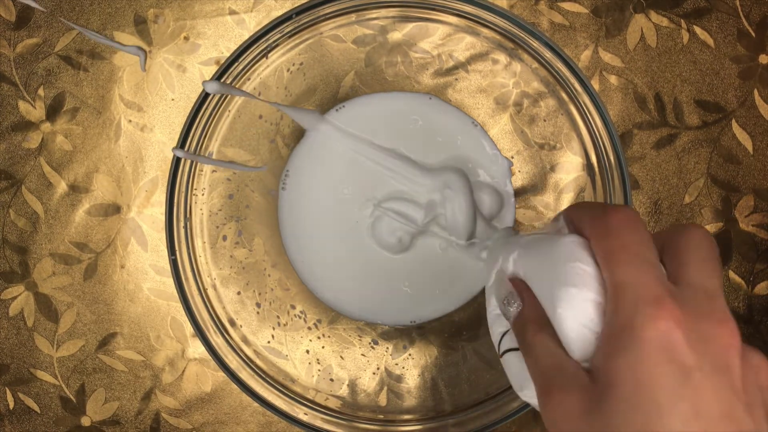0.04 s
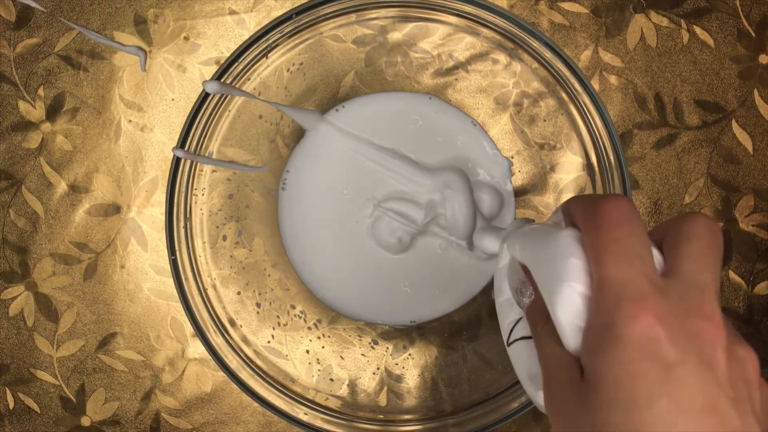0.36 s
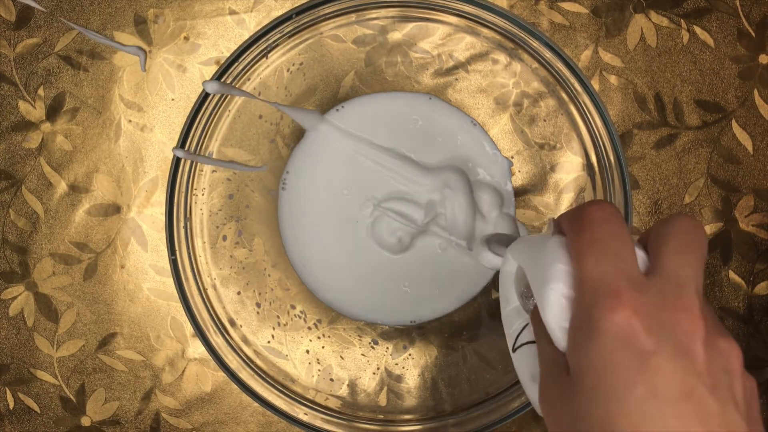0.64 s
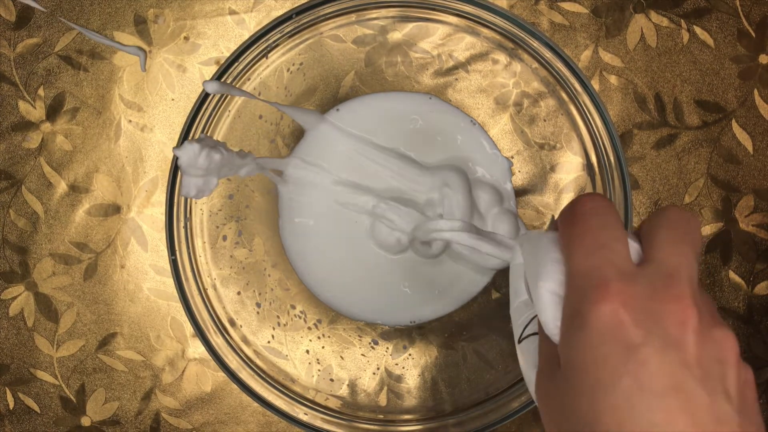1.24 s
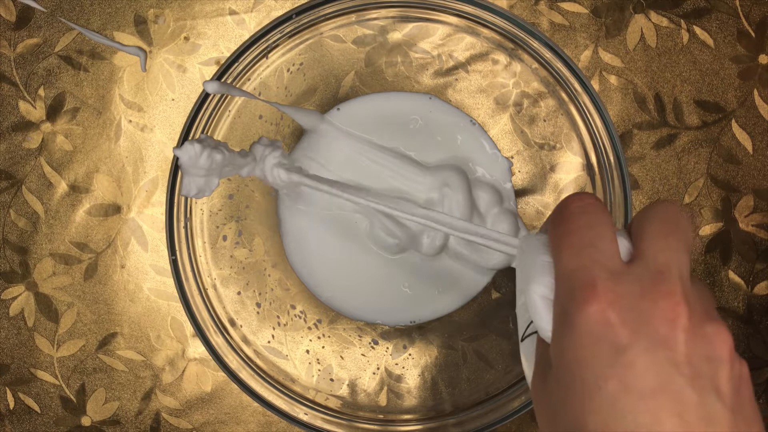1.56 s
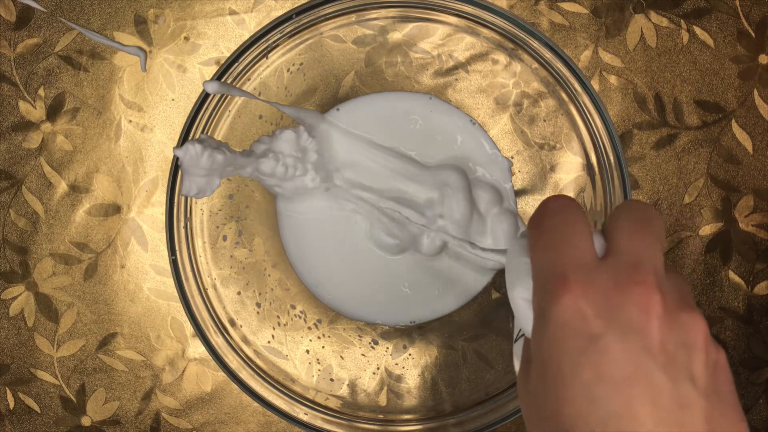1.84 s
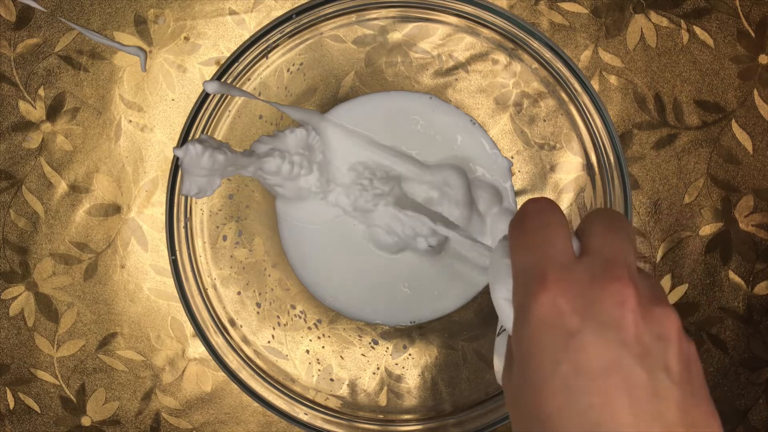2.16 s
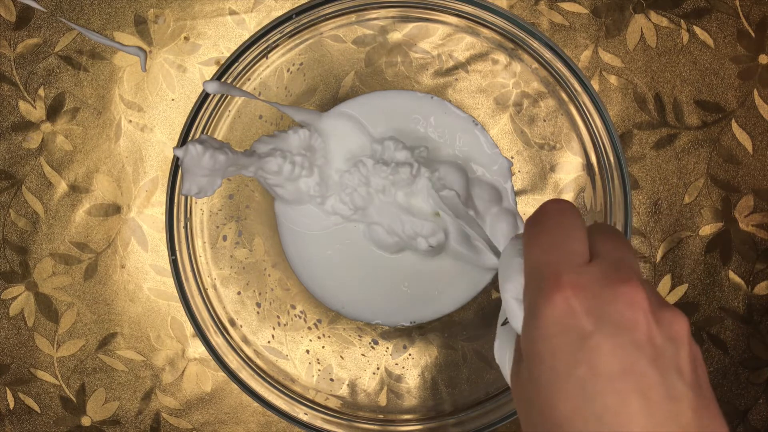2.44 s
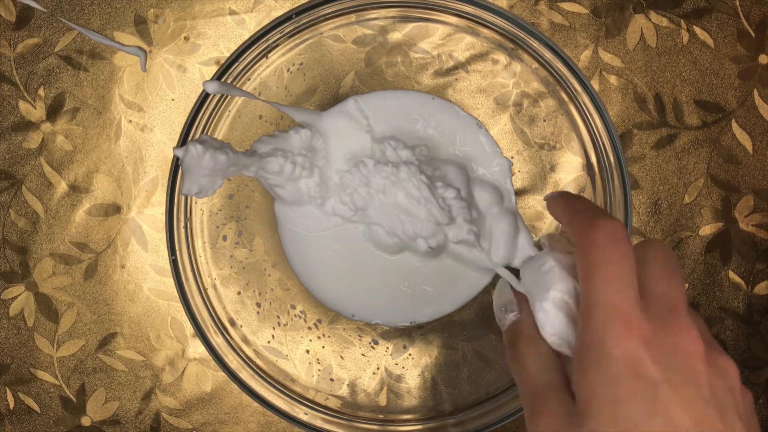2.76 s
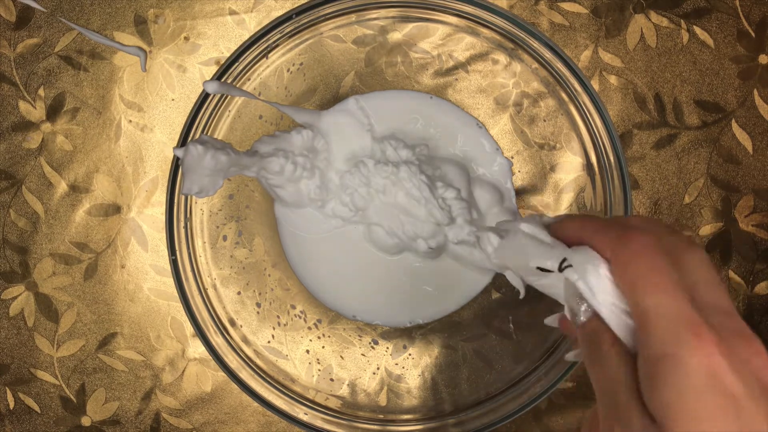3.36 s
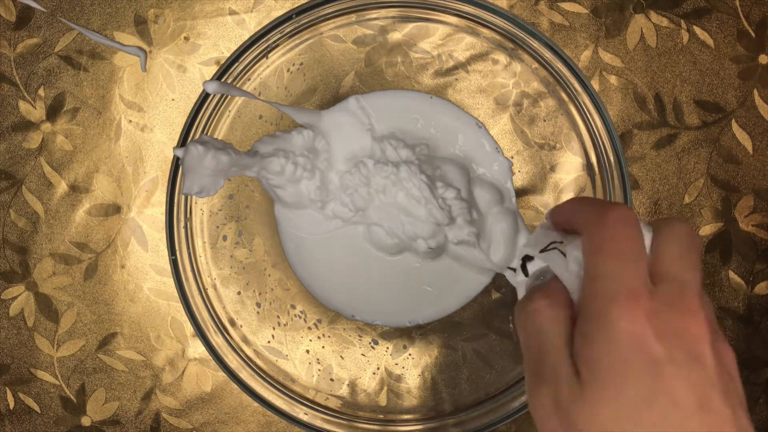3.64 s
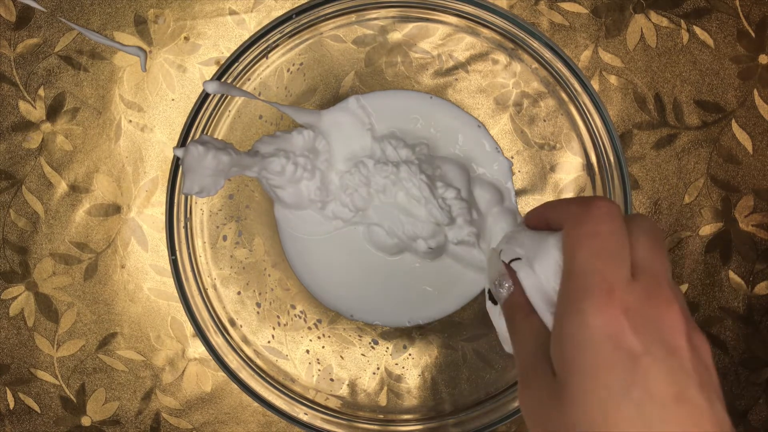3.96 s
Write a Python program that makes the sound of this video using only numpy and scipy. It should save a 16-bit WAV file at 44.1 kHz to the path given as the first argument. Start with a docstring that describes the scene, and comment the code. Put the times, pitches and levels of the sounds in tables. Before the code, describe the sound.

Foam sputters from a squeezed plastic bottle in short, hissing puffs that thicken and splatter into a glass bowl. Before and after, a hand faintly rubs and crinkles the plastic. Heard close by in a quiet room.

```python
"""Short crackling puffs, with sizzle between them and a few ringing bubbles, run together and splatter.
A soft plastic bottle is being squeezed empty over a glass bowl on a table, close by in a quiet room.
Each puff is trapped air bursting through the foam in the nozzle; the foam splatters as it lands.
Before and after, the hand rubs and crinkles the plastic."""
import sys
import numpy as np
from scipy import signal
from scipy.fft import rfft, irfft
from scipy.io import wavfile
from scipy.ndimage import uniform_filter1d

SR = 44100
rng = np.random.default_rng(int(sys.argv[2]) if len(sys.argv) > 2 else 0)


def wav_out(sig):
    """Save sig, one row per channel (or a flat mono array), as 16-bit PCM at SR to the path in sys.argv[1]."""
    wavfile.write(sys.argv[1], SR, np.round(np.clip(np.atleast_2d(sig).T, -1, 1) * 32767).astype(np.int16))


N = 176400
T = np.arange(N) / SR
FREQS = np.fft.rfftfreq(8192, 1 / SR)
GURGLE_HZ, SPIT_HZ, HISS_HZ = 2110, 5030, 7840  # where a puff's low, middle and high parts begin
TOP_HZ = 15900  # upper edge of the treble
BUBBLE_RISE_S = 0.00022
# How loud the sizzle between puffs is: t/s, level/dB
SIZZLE = [(.4, -78), (.43, -58), (.482, -62), (.51, -55.5), (.58, -56.5), (.67, -57), (.72, -52),
          (.86, -45), (.98, -49.5), (1.04, -61), (1.15, -73.5), (1.205, -58), (1.235, -63.5), (1.28, -54.5),
          (1.45, -51.5), (1.58, -51.5), (1.68, -48), (1.78, -48.5), (1.87, -56.5), (2.12, -52),
          (2.23, -41.5), (2.32, -46), (2.47, -46.5), (2.57, -49), (2.635, -50.5), (2.68, -85)]


def undb(db):
    """Turn decibels into a gain to multiply by."""
    return 10 ** (np.asarray(db) / 20)


def curve(rows, column=1):
    """One column of a table, joined by straight lines in time."""
    rows = np.array(rows)
    return np.interp(T, rows[:, 0], rows[:, column])


def noise():
    """White noise: an even hiss with a level of one."""
    return rng.standard_normal(N)


def colour(points):
    """A gain for each frequency, drawn through rows of f/Hz, level/dB."""
    hz, db = np.array(points).T
    return undb(np.interp(np.log(FREQS + 1), np.log(hz), db))


def resonance(hz, width):
    """Gains that favour the frequencies near one pitch."""
    return 1 / np.hypot(1, (FREQS ** 2 - hz ** 2) / (FREQS * width + 1))


def above(hz, order=12):
    """Gains that keep what lies above hz; a higher order cuts more sharply."""
    return 1 / np.sqrt(1 + (hz / (FREQS + 1)) ** (2 * order))


def below(hz, order=12):
    """Gains that keep what lies below hz."""
    return 1 / np.sqrt(1 + (FREQS / hz) ** (2 * order))


def ring(x, gain):
    """Filter x with the given gains, scaled so that white noise keeps its level."""
    cepstrum = irfft(np.log(gain / gain.max() + 1e-4))
    half = len(cepstrum) // 2
    # Folding puts all the ringing after the sound that starts it.
    folded = np.r_[cepstrum[0], 2 * cepstrum[1:half], np.zeros(half)]
    response = irfft(np.exp(rfft(folded)))[:half]
    return signal.fftconvolve(x, response / np.linalg.norm(response))[:N]


def crackle(per_s, decay_s, spread_db):
    """Loudness over time of tiny bursts of random timing and size, near one overall."""
    power = (rng.random(N) < per_s / SR) * undb(spread_db * noise()) ** 2 / per_s
    power = signal.lfilter([1], [1, -np.exp(-2 / (decay_s * SR))], power)
    return np.sqrt(power / power.mean())


def swell(level, open_s=0.0012):
    """Smooth a loudness curve so that each burst takes a moment to open."""
    return np.sqrt(np.abs(uniform_filter1d(level ** 2, int(open_s * SR))))


def room_tone():
    """Quiet room air with a low mains hum."""
    # Tones of the hum: f/Hz, level/dB
    hum_tones = [(49.2, -77.5), (98.4, -80.5), (197.3, -79)]
    # Tone colour of the air: f/Hz, relative level/dB
    air_colour = [(28, -27), (45, 1), (70, 1.5), (120, -5), (200, -6), (400, -12.5), (1000, -19.5),
                  (3000, -14.5), (16000, -34.5)]
    hum = sum(undb(db) * np.sqrt(2) * np.sin(2 * np.pi * (hz * T + rng.random()))
              for hz, db in hum_tones)
    return hum + undb(-70.5) * ring(noise(), colour(air_colour))


def hand_rub():
    """Skin slips over the plastic in fine grains; the full bottle sounds duller."""
    # How loud the rubbing is: t/s, level/dB
    rub_levels = [(0, -63), (.03, -57.5), (.145, -56), (.17, -60), (.31, -61.5), (.34, -66), (.39, -71),
                  (.42, -57.5), (.6, -72), (2.68, -60.5), (2.74, -56), (2.88, -60.5), (3.0, -69.5),
                  (3.02, -60), (3.135, -55), (3.18, -60), (3.25, -56.5), (3.42, -66.5), (3.44, -57.5),
                  (3.52, -60.5), (3.67, -58.5), (3.8, -63), (3.92, -56.5), (4.0, -58)]
    # Its tone colour: f/Hz, relative level/dB
    rub_colour = [(200, -7), (430, -9), (650, -3), (950, -6), (1500, -1), (2400, -0.5), (3200, -4.5),
                  (3900, 0.5), (4800, -5), (6300, -1), (7800, -4), (9400, 0), (10400, -6.5), (13500, -2),
                  (16000, -6)]
    grains = noise() * crackle(per_s=2500, decay_s=0.00083, spread_db=4.5) * undb(curve(rub_levels))
    bright = ring(grains, colour(rub_colour) * below(TOP_HZ, order=30))
    dull = signal.lfilter(*signal.butter(1, 9900, fs=SR), bright)
    return np.where(T < 0.98, dull, bright)


def crinkles(decay_s=0.0013, boost_db=2.5):
    """The plastic wall crinkles with single ticks."""
    # Ticks: t/s, peak level before the boost/dB, centre f/Hz
    ticks = [(0.021, -53, 2500), (.128, -46, 7000), (.14, -40.5, 9050), (.206, -40.5, 1500),
             (.315, -42, 7080), (.362, -47, 4470), (.402, -47, 5970), (2.72, -43, 11000),
             (2.737, -38.5, 10000), (2.828, -44, 7000), (2.846, -45.5, 2500), (2.865, -39.5, 7000),
             (3.22, -37, 14900), (3.634, -42, 14000), (3.646, -38, 13600), (3.662, -37, 14000),
             (3.671, -36, 6400), (3.839, -44, 6000), (3.922, -42, 11000), (3.975, -47, 12000)]
    out, t = np.zeros(N), T[:SR // 80]
    for start, db, hz in ticks:
        i = int(start * SR)
        burst = rng.standard_normal(len(t)) * np.exp(-t / decay_s)
        spectrum = rfft(burst, 2 * len(FREQS) - 2) * resonance(hz, width=4800) * below(TOP_HZ)
        tick = irfft(spectrum)[:len(t)]
        out[i:i + len(t)] += undb(db + boost_db) * tick / np.abs(tick).max()
    return out


def sizzle_levels():
    """Spit, hiss and gurgle levels of trickling foam: lone ticks merge as it flows harder."""
    # Tone colour of the sizzle: t/s, hiss/dB, gurgle/dB (both relative to the spit)
    balance = [(.5, -6.5, -1.5), (.65, -3.5, -5), (.75, 5.5, -9), (1.0, 3, -17), (1.15, 5.5, 7),
               (1.35, -1, -18), (1.76, 4, -9.5), (1.85, 4, 2), (1.98, 1, 13.5), (2.15, 1.5, -6),
               (2.4, 4.5, -6.5), (2.55, 8.5, -7), (2.64, -6, -7.5)]
    db = curve(SIZZLE)
    doublings = np.clip((db + 52.5) / 5.5, -1, 4)  # 5.5 dB louder ticks twice as fast
    ticks = swell(crackle(per_s=260 * 2 ** doublings, decay_s=0.0014, spread_db=3.5))
    spit = undb(db) * np.hypot(0.3, ticks)  # a steady part plus the ticks
    fizz = np.hypot(0.69 * spit, 0.53 * undb(db))  # steadier in the treble
    return spit, fizz * undb(curve(balance)), spit * undb(curve(balance, column=2))


def puff_levels(attack_s=0.0012, release_s=0.00045, sag_db=2):
    """Spit, hiss and gurgle levels of the puffs: each opens, sags while foam films tear, and closes."""
    # Air puffs, before the trim: t/s, length/s, spit/dB, hiss/dB, gurgle/dB
    puffs = [(0.487, 0.0054, -41, -47.5, -37.5), (0.495, 0.0103, -42, -50, -44.5),
             (0.537, 0.0033, -39.5, -60, -53), (0.557, 0.007, -48, -54, -44),
             (0.678, 0.013, -44, -42.5, -50.5), (0.703, 0.019, -56, -44.5, -51),
             (0.725, 0.0064, -37.5, -29.5, -42), (0.738, 0.0071, -41, -42, -49),
             (0.767, 0.014, -40.5, -35.5, -48), (0.806, 0.018, -39, -34.5, -50.5),
             (0.824, 0.0077, -39, -35.5, -45.5), (0.855, 0.0077, -41, -39.5, -45.5),
             (0.872, 0.0042, -39, -39, -73), (0.893, 0.026, -39, -39, -51.5),
             (0.916, 0.0081, -38, -36, -61), (0.944, 0.0084, -51, -39, -54), (0.955, 0.011, -50, -38, -47),
             (0.973, 0.01, -34, -35.5, -45), (1.006, 0.005, -38, -37, -48), (1.059, 0.015, -54, -50, -58),
             (1.109, 0.01, -54, -50.5, -49), (1.167, 0.024, -50.5, -49.5, -52),
             (1.245, 0.011, -55, -43.5, -56), (1.271, 0.0071, -44.5, -43, -50.5),
             (1.346, 0.02, -48, -52, -63), (1.373, 0.008, -38, -39.5, -52.5),
             (1.397, 0.0021, -55, -54, -52), (1.403, 0.0044, -36, -44, -54), (1.427, 0.0034, -41, -46, -59),
             (1.464, 0.0044, -39, -41, -54.5), (1.502, 0.0039, -43, -42, -54),
             (1.54, 0.0057, -44, -40, -55), (1.548, 0.0043, -41, -38, -53),
             (1.588, 0.022, -38.5, -39, -52.5), (1.624, 0.0021, -33, -49, -63),
             (1.638, 0.0069, -51, -36, -42), (1.648, 0.01, -36, -38, -38.5),
             (1.664, 0.0026, -34, -46, -37.5), (1.67, 0.024, -40, -40, -50),
             (1.713, 0.0043, -36.5, -37, -53), (1.747, 0.005, -40, -37.5, -48),
             (1.787, 0.012, -35.5, -36.5, -37.5), (1.798, 0.018, -35, -35.5, -34.5),
             (1.821, 0.006, -34.5, -36, -34), (1.832, 0.0031, -32, -38, -31),
             (1.837, 0.0048, -35, -35.5, -34), (1.843, 0.0051, -31.5, -45, -37),
             (1.861, 0.0075, -36, -43, -37.5), (1.887, 0.0062, -40, -48, -33.5),
             (1.909, 0.0049, -37, -47, -33), (1.931, 0.01, -46, -61, -39.5), (1.969, 0.0087, -45, -49, -38),
             (1.999, 0.0016, -39, -47, -28.5), (2.011, 0.005, -43.5, -43.5, -38),
             (2.026, 0.0061, -39, -43.5, -35), (2.052, 0.01, -38.5, -43, -35.5),
             (2.086, 0.02, -35, -36.5, -39.5), (2.13, 0.009, -34, -37.5, -39.5),
             (2.157, 0.0076, -33, -39, -36), (2.174, 0.0085, -53, -35.5, -41),
             (2.191, 0.009, -35, -37, -38.5), (2.202, 0.027, -36.5, -40, -40), (2.24, 0.01, -35, -57, -39),
             (2.253, 0.033, -42, -54, -42), (2.289, 0.0022, -32, -40, -40), (2.303, 0.0068, -41, -40, -45),
             (2.315, 0.0024, -32, -40, -38), (2.324, 0.0055, -33.5, -42, -41.5),
             (2.334, 0.015, -35.5, -38, -49), (2.351, 0.015, -35.5, -39.5, -42),
             (2.37, 0.0024, -31, -39, -56), (2.38, 0.0046, -34.5, -41, -41), (2.394, 0.0048, -37, -39, -45),
             (2.405, 0.026, -38.5, -42, -45.5), (2.43, 0.017, -36, -37, -46),
             (2.452, 0.0041, -38.5, -42, -44), (2.46, 0.0035, -38, -28.5, -46),
             (2.496, 0.01, -61, -38.5, -51), (2.522, 0.011, -46, -44, -48), (2.535, 0.016, -51, -35, -51),
             (2.609, 0.022, -48, -51, -53.5), (2.632, 0.0082, -51, -50, -48)]
    trim_db = [-1.5, -0.5, -1.5]
    films = crackle(per_s=2500, decay_s=0.00051, spread_db=1.5) + 0.057
    out, t = np.zeros((3, N)), T[:SR // 16]
    for start, length, *dbs in puffs:
        i = int(start * SR)
        opening = np.minimum(t / attack_s, 1)
        sag = undb(-sag_db * np.minimum(t / length, 1))
        closing = np.exp(-np.maximum(t - length, 0) / release_s)
        torn = opening * sag * closing * films[i:i + len(t)]
        torn *= np.sqrt((length + release_s) * SR) / np.linalg.norm(torn)
        out[:, i:i + len(t)] += undb(dbs)[:, None] * torn
    return out * undb(trim_db)[:, None]


def nozzle(spit, hiss, gurgle, rush_db=-7.5):
    """Rushing air rings the nozzle and bottle, whose tone changes as the bottle empties."""
    # Their resonances: f/Hz, width/Hz, level when full/dB, level when nearly empty/dB
    modes = [(2500, 480, -6.5, -8.5), (3130, 380, -12, -27), (3950, 640, 3.5, -9), (4474, 410, -1.5, 3),
             (5420, 430, 1.5, 8.5), (5870, 290, -20, 10), (6350, 600, 3, -1), (6915, 940, 2.5, 9.5),
             (9520, 1140, -6, 2), (11900, 440, -12.5, -24), (12700, 550, -28, -4), (13800, 690, -25, -17)]
    empty = np.interp(T, (1.97, 2.023), [0, 1])
    parts = [(gurgle, above(GURGLE_HZ, order=6) * below(SPIT_HZ, order=24)),
             (spit, above(SPIT_HZ) * below(HISS_HZ)),
             (hiss, above(HISS_HZ) * below(TOP_HZ, order=30))]
    out = np.zeros(N)
    for state, share in enumerate([1 - empty, empty]):
        peaks = sum((undb(dbs[state]) * resonance(hz, width) ** 2) ** 2 for hz, width, *dbs in modes)
        body = np.sqrt(undb(rush_db) ** 2 + peaks)
        for level, band in parts:
            out += ring(noise() * level * np.sqrt(share), body * band)
    return out


def squelch(spit, gurgle, per_s=650, scatter_octaves=0.18, cycles=3.15, glide_per_s=7.9):
    """A swarm of tiny bubbles chirps in the nozzle, louder when the air drives it harder."""
    # Centre pitch of the swarm: t/s, f/Hz
    pitches = [(.49, 4670), (.62, 5500), (.75, 7000), (1.0, 7080), (1.06, 3720), (1.2, 2800), (1.25, 5400),
               (1.38, 6440), (1.76, 6470), (1.8, 4200), (1.95, 3630), (2.02, 3950), (2.06, 5550),
               (2.095, 6600), (2.15, 4700), (2.25, 5670), (2.46, 7100), (2.62, 6400)]
    out, t, pitch = np.zeros(N), T[:SR // 80], curve(pitches)
    chance, detune, size, glide = rng.random(N), noise(), noise(), noise()
    for i in np.flatnonzero(chance[:N - len(t)] < per_s / SR):
        hz = min(pitch[i] * 2 ** (scatter_octaves * detune[i]), TOP_HZ)
        drive = gurgle[i] if hz < SPIT_HZ else spit[i]
        decay_s = cycles / hz
        shape = t / decay_s * np.exp(1 - t / decay_s)
        chirp = np.sin(2 * np.pi * hz * t * (1 + glide_per_s * glide[i] * t / 2))
        out[i:i + len(t)] += drive * undb(-3 - 4.5 * size[i]) * shape * chirp
    return out


def fine_bubbles(hiss, per_s=1100, decay_s=0.0012):
    """The finest bubbles burst with brief pings, each at its own pitch in the treble."""
    out, t = np.zeros(N), T[:SR // 160]
    shape = (1 - np.exp(-t / BUBBLE_RISE_S)) * np.exp(-t / decay_s)
    chance, place, size = rng.random(N), rng.random(N), noise()
    for i in np.flatnonzero(chance[:N - len(t)] < per_s / SR):
        hz = HISS_HZ * (TOP_HZ / HISS_HZ) ** place[i]
        out[i:i + len(t)] += hiss[i] * undb(-6 + 2.5 * size[i]) * shape * np.sin(2 * np.pi * hz * t)
    return out


def splatter(spit):
    """Foam lands in the bowl with a hollow splat."""
    # How loud the splatter is: t/s, level relative to the spit/dB
    levels = [(.5, -21), (.7, -23.5), (1.0, -33.5), (1.6, -27), (1.66, -19.5), (1.78, -31), (1.8, -16.5),
              (1.84, -9.5), (1.95, -8.5), (2.03, -7.5), (2.1, -16), (2.22, -6.5), (2.33, -16),
              (2.44, -12.5), (2.5, -14), (2.63, -23.5)]
    # Its hollow resonances: f/Hz, width/Hz, relative level/dB
    modes = [(141, 98, 0), (279, 170, 6.5), (670, 320, 3.5), (935, 460, -2.5), (1310, 290, 4),
             (1756, 380, -0.5), (2320, 470, 2.5)]
    hollow = np.sqrt(sum((undb(db) * resonance(hz, width) ** 2) ** 2 for hz, width, db in modes))
    return ring(noise() * spit * undb(curve(levels)), hollow * above(100, order=3))


def bubble_notes(rows, decay_s, glide_per_s=3.9):
    """Each bubble rings for a few milliseconds, rising slightly in pitch."""
    out, t = np.zeros(N), T[:SR // 40]
    shape = (1 - np.exp(-t / BUBBLE_RISE_S)) * np.exp(-t / decay_s)
    for start, hz, db in rows:
        i = int(start * SR)
        out[i:i + len(t)] += undb(db) * shape * np.sin(2 * np.pi * hz * t * (1 + glide_per_s * t / 2))
    return out


def large_bubbles():
    """Larger bubbles ring as they burst."""
    # Bursts: t/s, f/Hz, level/dB
    bursts = [(.488, 4300, -44), (.676, 5700, -32.5), (.742, 6540, -26), (.908, 6900, -28),
              (.92, 6600, -25), (1.061, 2480, -42), (1.071, 3630, -40), (1.112, 3140, -41),
              (1.116, 3600, -34), (1.179, 5740, -35.5), (1.185, 2900, -43), (1.194, 2570, -42),
              (1.203, 2830, -51), (1.212, 2520, -44.5), (1.379, 6140, -25), (1.549, 4150, -32),
              (1.864, 3930, -33), (1.911, 4090, -27), (1.932, 3020, -28), (1.972, 3070, -22),
              (1.984, 4130, -17.5), (1.997, 2750, -23)]
    return bubble_notes(bursts, decay_s=0.0023)


def settling_foam():
    """The foam settles with short wet plips."""
    # Plips: t/s, f/Hz, level/dB
    plips = [(1.407, 1920, -46), (1.437, 1750, -47.5), (2.541, 3000, -31.5), (2.635, 2490, -28),
             (2.74, 750, -47), (2.786, 1450, -43.5), (2.846, 1330, -41)]
    return bubble_notes(plips, decay_s=0.0011)


def bowl_and_room(x, room_s=0.24, glass_s=0.6):
    """Quick echoes, ringing glass and a short room tail; the two times are for a 60 dB fade."""
    # Echoes off the bowl and table: delay/s, level/dB
    echoes = [(.00295, -14.5), (.0061, -23.5)]
    # Notes of the glass: f/Hz, level relative to the direct sound/dB
    glass_notes = [(1347, -12), (3095, 2), (3468, -3), (3968, 0)]
    t = T[:SR // 2]
    response = rng.standard_normal(len(t)) * np.exp(-np.log(1000) * t / room_s)
    response *= np.minimum(t / 0.0035, 1)
    response *= undb(-12) / np.linalg.norm(response)
    response[0] = 1  # the direct sound
    dull_echo = signal.lfilter(*signal.butter(1, 5960, fs=SR), signal.unit_impulse(SR // 1000))
    for delay, db in echoes:
        i = int(delay * SR)
        response[i:i + len(dull_echo)] += undb(db) * dull_echo
    fade = np.log(1000) / glass_s
    for hz, db in glass_notes:
        response += undb(db) * 2 * fade / SR * np.exp(-fade * t) * np.cos(2 * np.pi * hz * t)
    return signal.fftconvolve(x, response / np.linalg.norm(response))[:N]


def scene():
    """Sizzle and puffs drive the foam sounds; bubbles and the hand join them over the bowl."""
    sizzle = sizzle_levels()
    spit, hiss, gurgle = np.hypot(swell(puff_levels()), sizzle)
    foam = squelch(spit, gurgle) + splatter(spit) + nozzle(spit, hiss, gurgle) + fine_bubbles(hiss)
    sources = foam + large_bubbles() + settling_foam() + hand_rub() + crinkles()
    return (bowl_and_room(sources) + room_tone())[None]


def record(dry):
    """A steep filter cuts the top of the treble."""
    return signal.sosfilt(signal.ellip(10, .2, 70, TOP_HZ, fs=SR, output="sos"), dry)


dry = scene()
out = record(dry)
wav_out(out)
```